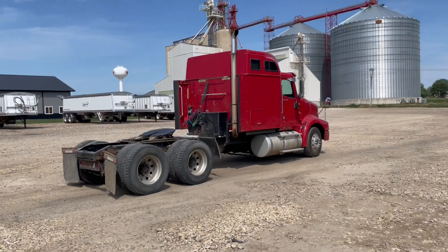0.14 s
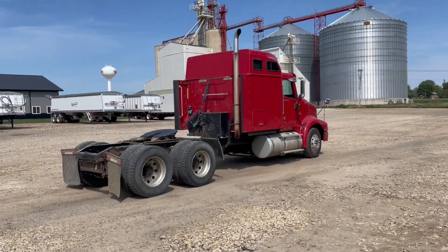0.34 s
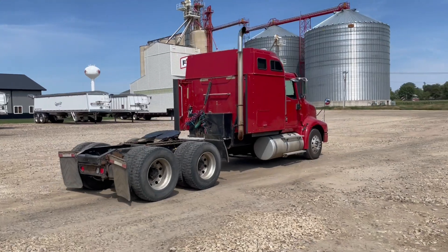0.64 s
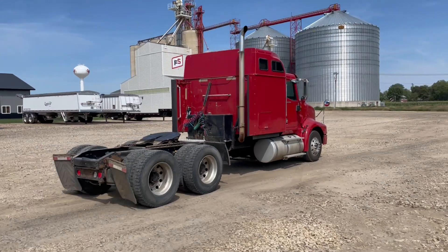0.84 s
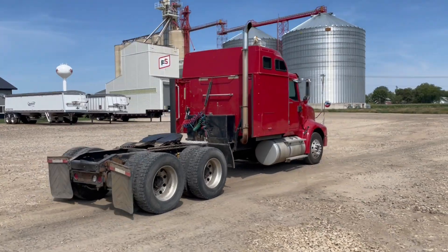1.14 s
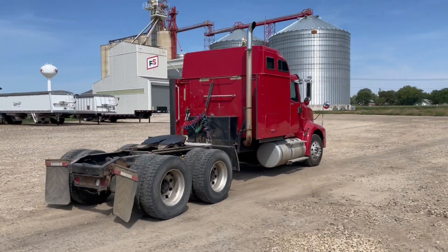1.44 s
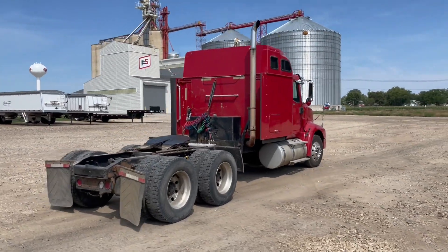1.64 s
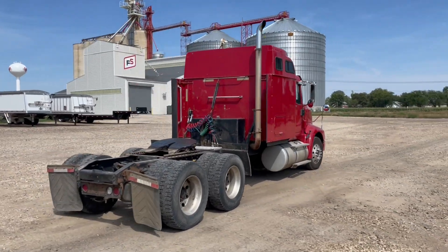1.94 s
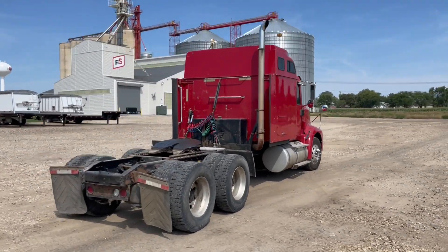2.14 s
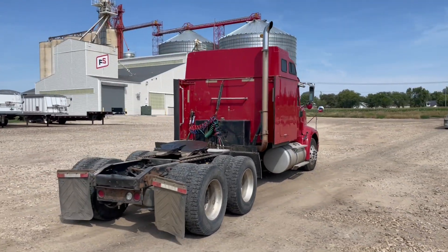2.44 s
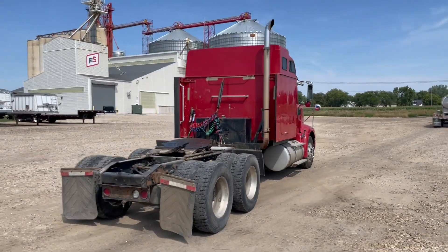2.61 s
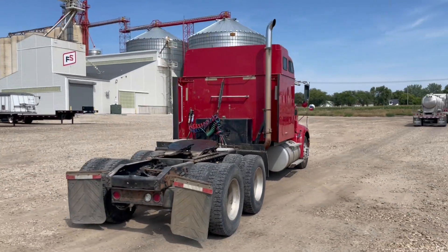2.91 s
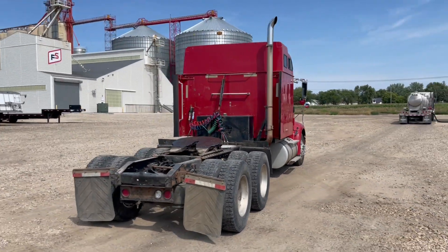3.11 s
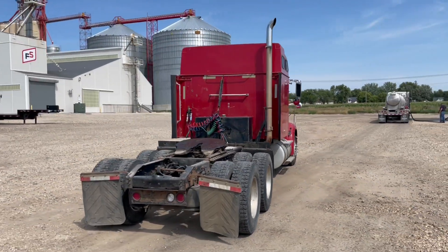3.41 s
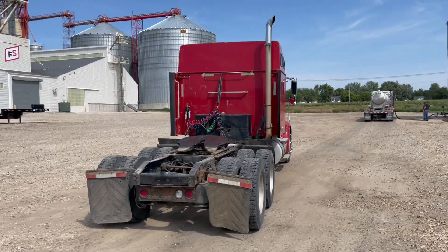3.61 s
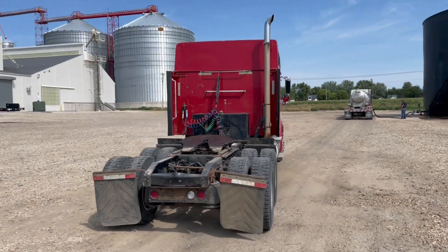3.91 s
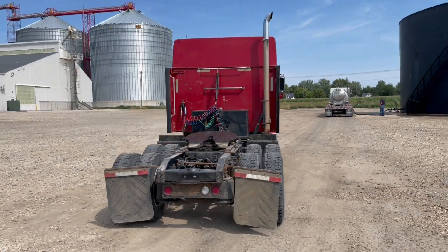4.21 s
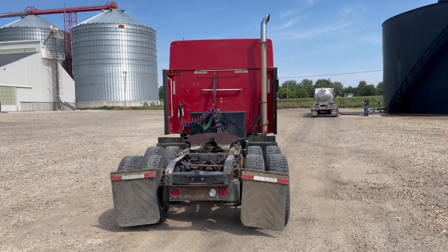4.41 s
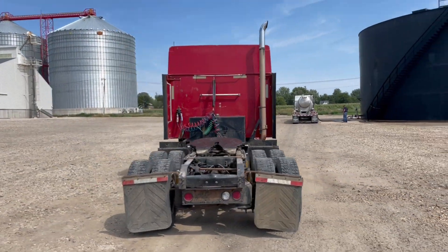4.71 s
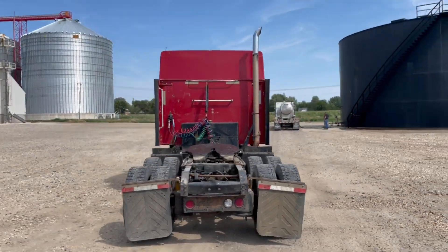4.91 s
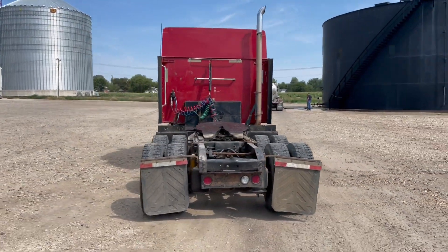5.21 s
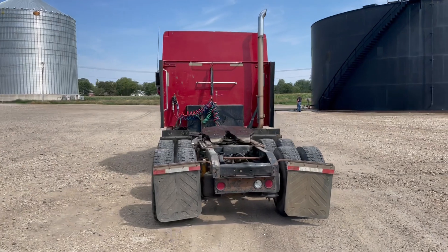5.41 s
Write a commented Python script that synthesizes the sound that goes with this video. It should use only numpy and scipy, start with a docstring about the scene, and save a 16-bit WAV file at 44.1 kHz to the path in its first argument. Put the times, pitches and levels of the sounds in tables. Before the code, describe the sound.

A diesel truck tractor clatters slowly away over a gravel yard, wind buffeting the microphone, with one loud ringing air-brake hiss between two lighter puffs.

```python
"""On a gravel yard a six-cylinder diesel tractor unit idles slowly past and away, its injectors knocking.
Each firing drives bursts of coloured noise and moves the exhaust note; narrow noise bands slide in pitch.
Grit crunches, a few stones snap and loose parts clank: noise under short envelopes.
The air brakes let off three hisses of noise, the middle one loud and ringing in the valve.
Gusts of low noise and single swirling eddies buffet two closely spaced microphone ports."""
import sys
import numpy as np
from scipy import signal
from scipy.fft import rfft, irfft, next_fast_len
from scipy.io import wavfile
from scipy.ndimage import uniform_filter1d, minimum_filter1d, map_coordinates

SR = 44100
rng = np.random.default_rng(int(sys.argv[2]) if len(sys.argv) > 2 else 0)


def master(y):
    """Save y as 16-bit WAV."""
    cut = np.clip(np.atleast_2d(y).T, -1, 1)
    pcm = np.round(cut * 32767)  # scale
    wavfile.write(sys.argv[1], SR, pcm.astype(np.int16))


N = 244755

# engine speed: start_s, firings_per_s
FIRING_RATE = [(0.0, 32.27), (0.4, 33.67), (0.9, 32.36), (1.7, 32.7), (2.1, 32.23), (2.7, 33.1),
               (3.5, 33.62), (4.0, 32.81), (4.4, 30.8), (4.7, 33.5), (5.3, 32.02), (5.55, 31.62)]
# engine as the cab hides it and the gap under the chassis shows it again:
# start_s, level_db, knocks_over_running_noise_db
ENGINE_VIEW = [(0, -1, -2.5), (1.6, -0.5, -5), (2.5, -2.6, -4), (3.1, -3.5, -5), (3.9, -5, -4.5),
               (4.35, -6, -10.5), (4.65, -3.5, 2), (4.85, -3, -8), (5.05, -6, -8), (5.55, -7, -2.5)]
# left-right likeness of engine, air and wind: pitch_hz, coherence (0 to 1)
ENGINE_ALIKE = [(60, 0.44), (150, 0.42), (600, 0.71), (1300, 0.87), (3000, 0.67), (7000, 1), (12000, 1)]
AIR_ALIKE = [(500, 0.67), (1200, 0.94), (4000, 0.79), (12000, 1)]
WIND_ALIKE = [(60, 1), (150, 0.53), (400, 0.71)]


def amp(db):
    """Amplitude factor of a level in dB."""
    return 10 ** (np.asarray(db) / 20)


def unit(x):
    """Scale to an rms of 1."""
    return x / np.sqrt(np.mean(x ** 2) + 1e-20)


def along(points, hz):
    """Read (Hz, value) points at any frequency, on a log axis."""
    f, v = np.transpose(points)
    return np.interp(np.log(hz + 1), np.log(f + 1), v)


def curves(rows):
    """One value per sample for each column after the time."""
    s, *cols = np.transpose(rows)
    return [np.interp(np.arange(N) / SR, s, c) for c in cols]


def wobble(rate):
    """A smooth random curve, rate knots a second."""
    knots = rng.standard_normal(int(N * rate / SR) + 4)
    return map_coordinates(knots, [np.arange(N) * rate / SR])


def filtered(x, response):
    """x times a complex response of frequency."""
    m = next_fast_len(N + SR // 2)
    return irfft(rfft(x, m) * response(np.fft.rfftfreq(m, 1 / SR)), m)[..., :N]


def colour(spectrum, hz, peaks=()):
    """Response of a spectrum that falls away beyond its ends, with resonances on top."""
    low_end = 1 / (1 + (spectrum[0][0] / 2 / (hz + 1)) ** 4)
    high_end = 1 / (1 + (hz / 2 / spectrum[-1][0]) ** 4)
    ring = 1 + sum((amp(db) - 1) / (1 + 2j * (hz - centre) / width) for centre, width, db in peaks)
    return amp(along(spectrum, hz)) * low_end * high_end * ring


def rush(spectrum, alike, peaks=(), drive=1):
    """Stereo noise of rms 1, driven by an envelope before it is coloured."""
    def mid_side(hz):
        turn = np.arccos(np.clip(along(alike, hz), -1, 1)) / 2
        return colour(spectrum, hz, peaks) * [np.cos(turn), np.sin(turn)]
    mid, side = filtered(rng.standard_normal((2, N)) * drive, mid_side)
    return unit(np.array([mid + side, mid - side]))


def bursts(rows, t60, attack_s):
    """An envelope that jumps at each (s, dB) row and dies by 60 dB in t60 seconds."""
    t = np.arange(N) / SR
    return sum(amp(db - 60 * np.abs(t - s) / t60) * np.clip((t - s) / attack_s, 0, 1) for s, db in rows)


def strikes(sizes, decay_s):
    """Each impulse dies away exponentially."""
    return signal.lfilter([1], [1, -np.exp(-1 / (decay_s * SR))], sizes)


def knocks(firings, swell_s, bed, scatter_db):
    """One swelling, dying burst per firing, each cylinder at its own strength, over a steady bed."""
    # knock strength in firing order: level_db
    cylinders = [2.5, -3, 1, 3, -2.5, 1]
    index = np.floor(firings).astype(int) + 1
    scatter = scatter_db * rng.standard_normal(size=256)[index]
    size = amp(np.array(cylinders)[(index - 1) % len(cylinders)] + scatter)
    age = firings % 1 / curves(FIRING_RATE)[0] / swell_s
    return np.hypot(bed, amp(curves(ENGINE_VIEW)[1]) * size * age * np.exp(1 - age))


def turned_away():
    """How far the truck shows its back, from side-on to straight behind."""
    # view: start_s, share_behind (0 side-on to 1 from behind)
    view = [(.4, 0.021), (2, 0.31), (3.2, 1)]
    return curves(view)[0]


def turning(side, rear, behind, drive):
    """Cab and wheels screen different bands as the truck turns its back: side colour fades into rear."""
    # ringing of the block and its covers: pitch_hz, width_hz, peak_db
    covers = [(594, 300, 5.5)]
    from_side = np.sqrt(1 - behind) * rush(side, ENGINE_ALIKE, covers, drive)
    from_rear = np.sqrt(behind) * rush(rear, ENGINE_ALIKE, covers, drive)
    return from_side + from_rear


def gear_slaps(level_db):
    """Gears and valve train slap at random moments, regardless of the firings; some knocks stand out."""
    # slap colour: pitch_hz, relative_db_per_hz
    slap = [(350, -8), (600, 8.5), (850, 0), (1100, 2.5), (1600, -4), (2100, -15.5), (2800, -25.5),
            (5000, -35)]
    # knocks harder than the rest: start_s, level_db
    hard_knocks = [(0.152, -30), (0.39, -27), (0.423, -22), (0.603, -16.5), (0.757, -17), (1.555, -19),
                   (1.801, -20), (2.354, -17.5), (2.542, -19), (3.054, -27), (3.827, -20), (3.892, -22.5),
                   (4.166, -24.5), (4.195, -27), (4.263, -21), (4.324, -23), (4.487, -32), (4.639, -33),
                   (4.674, -19), (4.727, -29), (4.976, -33)]
    slaps_per_s, decay_s, slaps_db = 110, 0.0025, -37.5
    sizes = (rng.random(N) < slaps_per_s / SR) * (.5 + .5 * rng.random(N))
    slaps = amp(slaps_db + level_db) * rush(slap, ENGINE_ALIKE, drive=strikes(sizes, decay_s))
    hard = bursts(hard_knocks, t60=.032, attack_s=.0005) * rush(slap, ENGINE_ALIKE)
    return slaps, hard


def sliding_band(track, width_hz, drive):
    """A narrow band of knocking noise whose pitch slides: low-passed noise shifted up to a moving centre."""
    hz, db = curves(track)
    struck = drive * rng.standard_normal((2, N))
    a, b = filtered(struck, lambda offset: 1 / (1 + 1j * offset / width_hz) ** 2)
    phase = 2 * np.pi * np.cumsum(hz) / SR
    tone = a * np.cos(phase) + b * np.sin(phase)
    return amp(db) * unit(amp(4.3 * wobble(13)) * tone)


def sliding_bands(rattles):
    """Two narrow bands of knocking noise stand out, the upper one brighter and wider."""
    # band reinforced by the ground reflection, sliding as the path changes: start_s, pitch_hz, level_db
    low_track = [(0, 1269, -60), (1.6, 1370, -52), (2.2, 1335, -37.5), (3, 1291, -41.5), (3.8, 1290, -51),
                 (4.4, 1335, -52.5), (4.75, 1388, -36), (5.05, 1425, -41), (5.55, 1420, -46)]
    # brighter band, strongest as the cab goes by: start_s, pitch_hz, level_db
    high_track = [(0, 1650, -53), (.7, 1900, -42), (1.3, 2080, -39.5), (2.5, 2120, -44.5), (3.2, 2100, -41),
                  (4, 1950, -59), (5.55, 1900, -50)]
    return sliding_band(low_track, 60, rattles) + sliding_band(high_track, 260, rattles)


def exhaust_note(firings, behind):
    """Exhaust pulses sound as harmonics of the firing rate, each wavering in level."""
    # harmonics: multiple_of_firing_rate, relative_db
    harmonics = [(2, 3.5), (3, -4), (4, -9), (5, -4.5), (6, -6.5), (7, -39), (9, -10)]
    note = sum(amp(db + 5.7 * wobble(5)) * np.sin(2 * np.pi * (k * firings + rng.random()))
               for k, db in harmonics)
    return amp(-33.0 + 1.6 * behind) * unit(note)


def drifting_paths(x, depth_db):
    """Reflections off the chassis cut narrow ripples, drawn here as a random field that drifts in time."""
    z = signal.stft(x, nperseg=2048)[2]
    field = uniform_filter1d(rng.standard_normal(z.shape[1:]), size=3, axis=0)
    field = uniform_filter1d(field, size=22, axis=1)
    rippled = z * amp(depth_db * (unit(field) - depth_db / 10))
    return signal.istft(rippled, nperseg=2048)[1][:, :N]


def ground_bounce(x):
    """Direct sound plus a later, duller one off the ground: a comb of bands that slides with the delay."""
    # reflection: start_s, delay_behind_direct_s
    bounce = [(0, .003), (.4, .00313), (.7, .0032), (1.24, .00352), (1.8, .00367), (2.4, .00381),
              (3, .00387), (3.85, .00365), (4.4, .00365), (4.75, .0036), (5.3, .00354), (5.55, .00355)]
    bounce_gain, bounce_top_hz = .42, 4500
    late = np.arange(N) - curves(bounce)[0] * SR
    dull = filtered(x, lambda hz: 1 / (1 + (hz / bounce_top_hz) ** 2))
    echo = np.array([map_coordinates(side, [late]) for side in dull])
    return (x + bounce_gain * echo) / np.hypot(1, bounce_gain)


def engine():
    """Each firing thumps the block, rattles covers, ticks injectors and pushes the exhaust; gears slap."""
    # block seen from the side and from behind: pitch_hz, relative_db_per_hz
    block_side = [(45, -9), (65, -5), (100, 4), (170, -1.5), (230, 1.5), (290, 0), (400, -1), (470, 0),
                  (640, -7), (740, -6), (850, -8), (1200, -14)]
    block_rear = [(45, -5), (68, 9), (110, -7.5), (190, 3), (240, -5), (295, 2.5), (380, -11.5), (450, -6),
                  (560, -4), (690, -3), (850, -11.5), (1200, -23.5)]
    # clatter seen from the side and from behind: pitch_hz, relative_db_per_hz
    clatter_side = [(500, -21), (780, 2.5), (950, -0.5), (1350, -1.5), (1650, 2.5), (2100, 0.5),
                    (2700, -13), (4000, -15)]
    clatter_rear = [(500, -25), (800, 2.5), (1100, 4), (1500, 1.5), (1700, 0), (2050, -1), (2700, -9),
                    (4000, -33)]
    # injector ticks: pitch_hz, relative_db_per_hz
    tick_colour = [(1500, -3), (2700, 5), (3500, 4.5), (4500, 4), (6500, -3.5), (9000, -7.5), (12000, -20),
                   (15000, -24)]
    block_db, clatter_db, tick_db = -23, -31.5, -40  # before the view's level
    tick_shadow_db = -0.5  # extra loss from behind

    level_db = curves(ENGINE_VIEW)[0]
    firings = np.cumsum(curves(FIRING_RATE)[0]) / SR - .11
    behind = turned_away()
    thumps = knocks(firings, swell_s=.0045, bed=.8, scatter_db=1.5)
    rattles = knocks(firings, swell_s=.0033, bed=.4, scatter_db=1.6)
    ticks = knocks(firings, swell_s=.005, bed=.9, scatter_db=1.8)

    block = amp(block_db + level_db) * turning(block_side, block_rear, behind, thumps)
    clatter = amp(clatter_db + level_db) * turning(clatter_side, clatter_rear, behind, rattles)
    tick_level = amp(tick_db + level_db + tick_shadow_db * behind)
    tick = tick_level * rush(tick_colour, ENGINE_ALIKE, drive=ticks)
    slaps, hard = gear_slaps(level_db)
    running = drifting_paths(block + clatter + slaps + tick, depth_db=1.7)
    return ground_bounce(running + sliding_bands(rattles) + hard) + exhaust_note(firings, behind)


def gravel():
    """Fine grit crunches under the tyres as random tiny grains, and a few stones snap."""
    # stones snapping under a tyre: start_s, level_db
    stones = [(.492, -40), (.4997, -32), (.5155, -28), (.5177, -33), (.5214, -48)]
    grit = (rng.random(N) < 150 / SR) * rng.random(N)  # 150 grains a second
    grains = strikes(grit, decay_s=0.0046)
    crunch = rush([(600, 7), (2000, 11), (5000, -13.5), (14000, -34)], AIR_ALIKE, drive=grains)
    snap_noise = rush([(3000, 0), (7000, 8), (15000, -10)], AIR_ALIKE)
    return amp(-46.0) * crunch + bursts(stones, t60=0.0095, attack_s=.0001) * snap_noise


def gusting():
    """Strength of rumble and flutter: gusts swell, hold and drop on top of a light breeze."""
    # gusts: full_strength_s, rise_s, hold_s, rumble_db, flutter_db
    gusts = [(1.172, 0.19, 0.11, -24, -22.5), (1.425, 0.4, 0.12, -16.5, -23.5),
             (1.57, 0.2, 0.18, -22.5, -20.5), (1.787, .05, 0.023, -24.5, -38),
             (2.295, 0.08, 0.048, -22.5, -38), (2.414, 0.23, 0.11, -20, -31),
             (2.674, 0.17, 0.075, -18, -24), (2.892, 0.097, 0.026, -19.5, -27),
             (3.138, 0.17, 0.077, -20, -48), (3.68, 0.32, 0.42, -17.5, -28),
             (4.123, 0.052, 0.12, -13.5, -26.5), (4.368, 0.069, 0.15, -17, -25.5),
             (4.685, 0.076, 0.14, -27, -27.5), (4.997, 0.24, 0.076, -18.5, -48),
             (5.247, 0.13, 0.029, -26.5, -27), (5.507, 0.18, .03, -21.5, -29)]
    breeze_rumble_db, breeze_flutter_db = -28, -32.5
    fall_s = 0.21  # to a tenth of the strength; the rise starts its count from a tenth too
    t = np.arange(N) / SR
    power = amp([[breeze_rumble_db], [breeze_flutter_db]]) ** 2
    for s, rise, hold, rumble_db, flutter_db in gusts:
        shape_db = -20 * (np.maximum((s - t) / rise, 0) + np.maximum((t - s - hold) / fall_s, 0))
        power = power + amp(shape_db + np.array([[rumble_db], [flutter_db]])) ** 2
    return np.sqrt(power)


def port_eddies():
    """Single eddies strike the ports: a short low swirl with splutter, smaller ones spluttering most."""
    # eddies: centre_s, level_db, pitch_hz
    eddies = [(1.276, -13, 113), (1.462, -5.5, 147), (1.56, -14.5, 106), (1.614, -2, 85), (1.659, -5, 106),
              (1.684, -9, 94), (1.72, -6.5, 151), (1.742, -3, 203), (1.755, -9, 124), (2.447, -10, 85),
              (2.553, -16, 75.4), (2.613, -10.5, 86), (2.681, -7, 100), (2.706, -13, 226), (2.79, -15, 109),
              (4.105, -7.5, 90), (4.13, -9.5, 104), (4.214, -9.5, 80), (4.249, -7, 77), (4.526, -6, 213),
              (4.544, -8.5, 79), (4.561, -6.5, 140), (4.574, 1, 174)]
    splutter_hz = 450
    splutter = rush([(150, -10), (330, 0), (580, -6), (1100, -36), (3000, -70)], WIND_ALIKE)
    out = np.zeros((2, N))
    for s, db, hz in eddies:
        cycles = (np.arange(N) / SR - s) * hz
        swirl = np.cos(2 * np.pi * (cycles + rng.random())) + hz / splutter_hz * splutter
        out += amp(db) * np.exp(-(cycles / 0.73) ** 2) * swirl
    return out


def wind():
    """Gusts rumble and flutter on the ports as lumpy low noise; single eddies thump and splutter."""
    # rumble and flutter colours: pitch_hz, relative_db_per_hz
    buffet_colour = [(22, -40), (40, -18), (60, 0), (80, 0), (105, -1.5), (160, -17), (300, -30.5)]
    flutter_colour = [(70, -37), (130, 4.5), (220, 4), (330, -6.5), (500, -11.5), (900, -28), (2000, -50)]
    rumbling, fluttering = gusting()
    lumps = wobble(35)
    buffet = rumbling * unit(amp(1.0 * lumps) * rush(buffet_colour, WIND_ALIKE))
    flutter = fluttering * unit(amp(2.5 * lumps) * rush(flutter_colour, WIND_ALIKE))
    return buffet + flutter + port_eddies()


def chassis():
    """Loose parts clank or ping over the bumps, each ringing briefly in its own band."""
    # clanks: start_s, level_db, pitch_hz, width_hz
    clanks = [(0.725, -18, 1330, 600), (.746, -20, 1390, 300), (4.07, -30, 1840, 50)]
    out = np.zeros((2, N))
    for s, db, hz, width in clanks:
        band = [(hz / 3, -50), (hz - width, -12), (hz, 0), (hz + width, -12), (2 * hz, -45)]
        out += bursts([(s, db)], t60=0.035, attack_s=0.0013) * rush(band, ENGINE_ALIKE)
    return out


def venting(s, attack_s, open_s, sag_db_per_s, fall_db_per_s):
    """Air flow through a valve: it opens, sags with the pressure and dies quickly once it closes."""
    t = np.maximum(np.arange(N) / SR - s, 0)
    sag_db = sag_db_per_s * np.minimum(t, open_s)
    fall_db = fall_db_per_s * np.maximum(t - open_s, 0)
    return np.minimum(t / attack_s, 1) * amp(-sag_db - fall_db)


def brake_puffs():
    """Two light puffs of brake air, with faint whistles from the small ports."""
    # puffs: start_s, attack_s, open_s, level_db, sag_db_per_s, fall_after_closing_db_per_s
    puffs = [(.99, 0.037, 0.14, -22, 55, 275), (4.84, 0.031, 0.42, -31.5, 36.5, 103)]
    # colours of the first and last puff: pitch_hz, relative_db_per_hz
    first_air = [(1000, -8), (1900, 1), (2600, -7), (4000, -5), (4900, -4), (5900, -6), (6600, -5),
                 (8500, -3.5), (10500, 0), (14500, -8.5)]
    last_air = [(1200, -3.5), (2900, -0.5), (3300, -5), (3900, -2), (4500, -1.5), (5300, -3), (5800, -10),
                (8500, -12.5), (10200, -8.5), (14500, -13)]
    # whistles of the air ports: pitch_hz, width_hz, peak_db
    nozzle = [(3230, 170, 7.5), (4880, 630, 2.5)]
    out = np.zeros((2, N))
    for (s, attack, length, db, sag, fall), air in zip(puffs, [first_air, last_air]):
        out += amp(db) * venting(s, attack, length, sag, fall) * rush(air, AIR_ALIKE, nozzle)
    return out


def full_release():
    """The full brake release: its roar rings the valve and dies before its fizz; the valve chatters."""
    # roar and fizz colours: pitch_hz, relative_db_per_hz
    roar_colour = [(300, -49), (650, -1), (850, -1), (1150, -8), (1450, 0), (2200, -6), (2750, -8),
                   (3500, -5), (4700, -7), (6800, -6.5), (9000, -37), (14000, -14)]
    fizz_colour = [(3000, -2), (6500, -1), (9000, 4), (11000, 0.5), (14500, -1)]
    # resonances of the release valve: pitch_hz, width_hz, peak_db
    valve = [(684, 50, 4), (1026, 16, 9), (1095, 30, 13), (1151, 13, 21), (1313, 22, 9), (1620, 30, 7),
             (1880, 60, 5), (1936, 16, 7), (2085, 37, 5), (2430, 24, 6), (2586, 18, 8), (3470, 15, 11),
             (4403, 27, 7), (6154, 12, 8), (6561, 35, 5), (7160, 16, 9)]
    # spurts of air as the valve chatters: start_s, level_db
    spurt_rows = [(3.17, -8), (3.195, -28), (3.226, -14.5), (3.246, -20), (3.3, -19), (3.335, -23),
                  (3.421, -23.5), (3.5, -29)]
    release_s, attack_s, roar_db, fizz_db = 3.16, 0.017, -13, -15
    roar_flow = venting(release_s, attack_s, open_s=0.24, sag_db_per_s=17, fall_db_per_s=77)
    fizz_flow = venting(release_s, attack_s, open_s=0.57, sag_db_per_s=45, fall_db_per_s=121)
    spurt_colour = [(600, -12), (900, -6), (1140, 7), (1400, -4), (2200, -2), (3000, -12), (7000, -25)]
    spurts = bursts(spurt_rows, t60=.27, attack_s=.008) * rush(spurt_colour, AIR_ALIKE, valve)
    sputter = amp(.9 * wobble(70))
    roar = amp(roar_db) * sputter * roar_flow * rush(roar_colour, AIR_ALIKE, valve)
    fizz = amp(fizz_db) * fizz_flow * rush(fizz_colour, AIR_ALIKE)
    return roar + fizz + spurts


def two_ports(x):
    """The spaced ports hear the truck with a phase and level offset, split evenly between left and right."""
    # phase: pitch_hz, left_lead_rad
    port_phase = [(800, 0), (1640, .3), (2400, .7), (3300, .1), (5200, .5), (5800, -.3), (6800, -.7),
                  (8100, -3.1), (11400, -6.3), (15000, -9.4)]
    # balance: pitch_hz, left_minus_right_db
    port_balance = [(200, -1), (700, -2.1), (1300, -2.5), (2400, 0.5), (4400, 2), (8000, -0.5)]

    def response(hz):
        offset = 1j * along(port_phase, hz) + np.log(amp(along(port_balance, hz)))
        return np.exp(np.array([[.5], [-.5]]) * offset)
    return filtered(x, response)


def scene():
    """Truck and wind as they reach the two ports."""
    truck = engine() + gravel() + chassis() + brake_puffs() + full_release()
    return two_ports(truck) + wind()


def gain_control(x):
    """Loud treble turns everything down; the gain creeps back as the smoothed treble power decays."""
    threshold_db, cut_db_per_db, recovery_s = -23.5, 0.48, 0.13
    treble = filtered(x, lambda hz: hz > 800)
    keep = np.exp(-1 / (recovery_s * SR))
    power = signal.lfilter([1 - keep], [1, -keep], np.mean(treble ** 2, axis=0))
    over_db = np.maximum(10 * np.log10(power + 1e-12) - threshold_db, 0)
    return x * amp(-cut_db_per_db * over_db)


def record(dry):
    """Ride the gain, duck under the highest peaks, fade the very edges and cut all above a band limit."""
    top_hz = 15800
    x = gain_control(dry)
    needed = 1 / np.maximum(np.abs(x).max(axis=0) / .85, 1)
    held = x * uniform_filter1d(minimum_filter1d(needed, size=301), size=301)
    return filtered(held * signal.windows.tukey(N, .001), lambda hz: hz < top_hz)


dry = scene()
out = record(dry)
master(out)
```